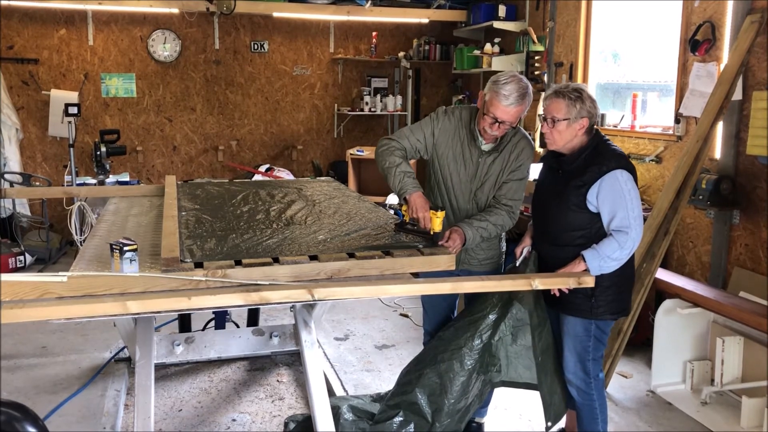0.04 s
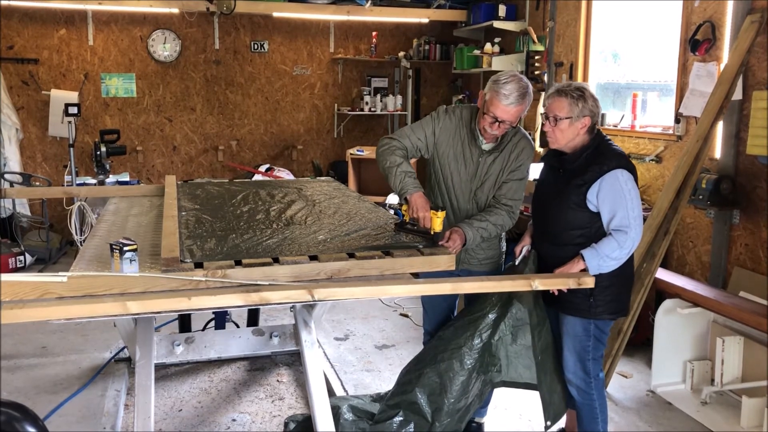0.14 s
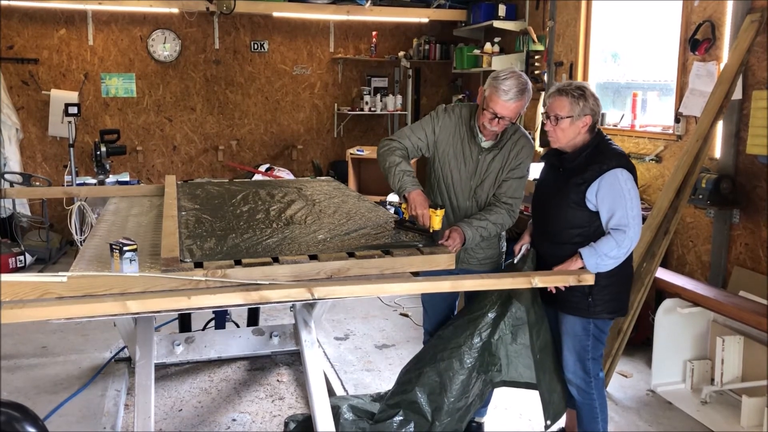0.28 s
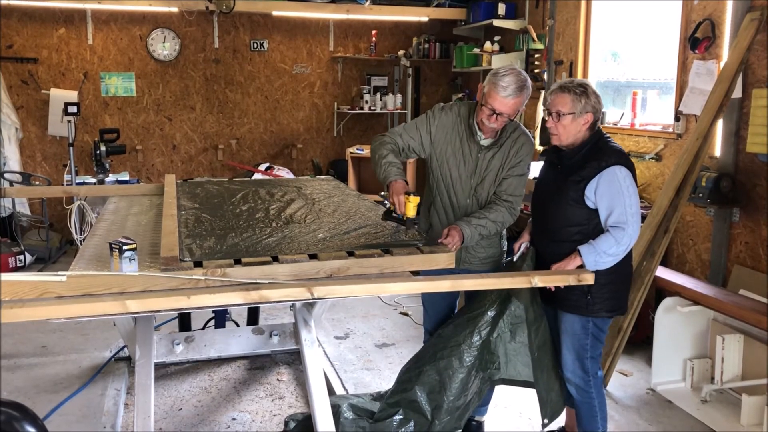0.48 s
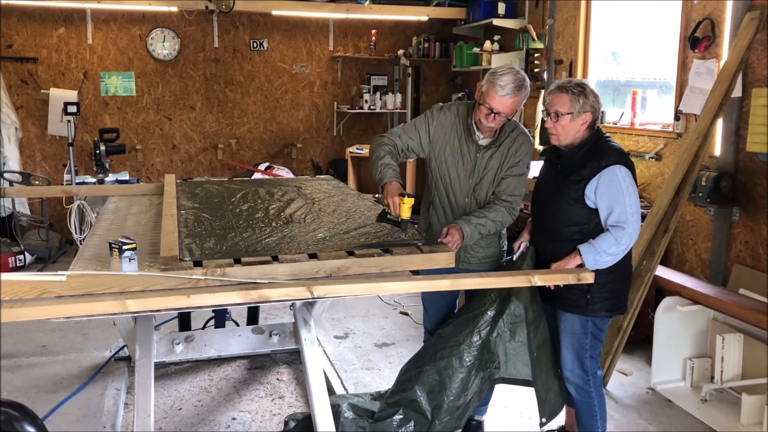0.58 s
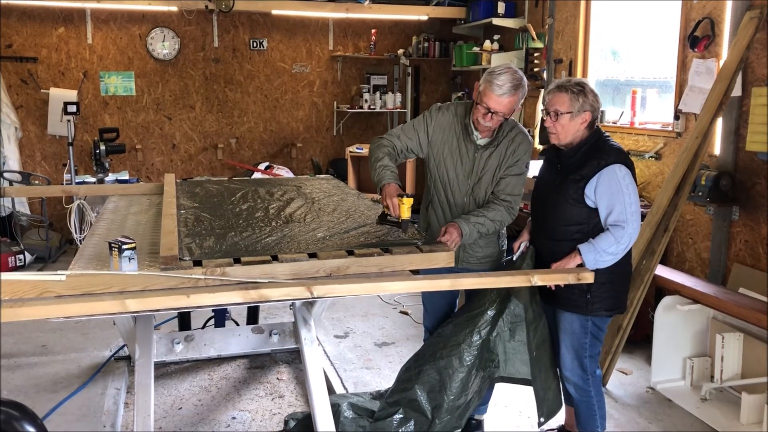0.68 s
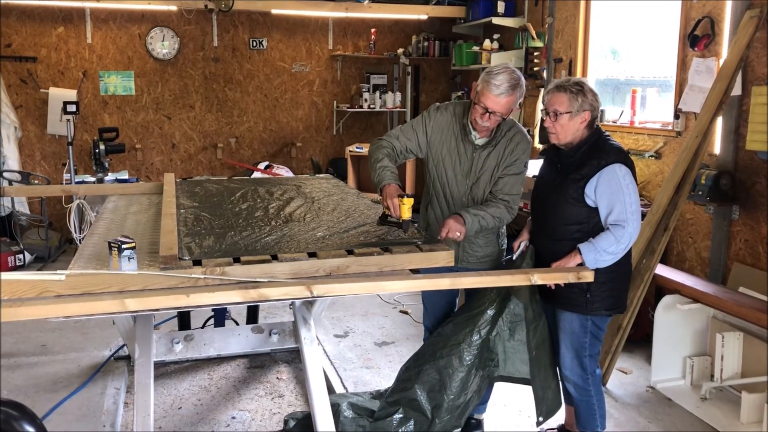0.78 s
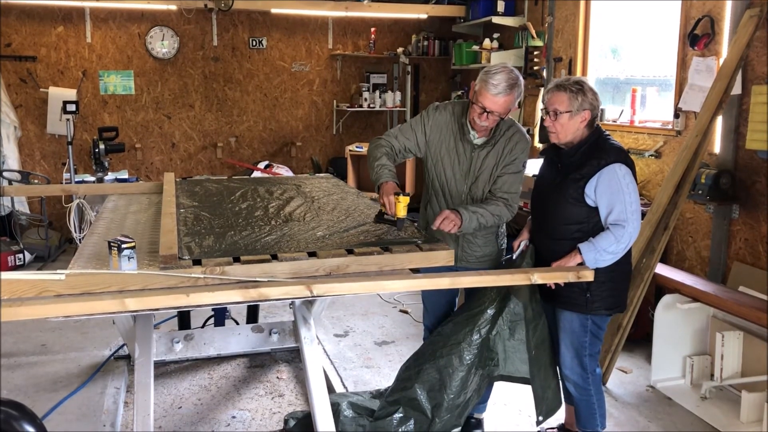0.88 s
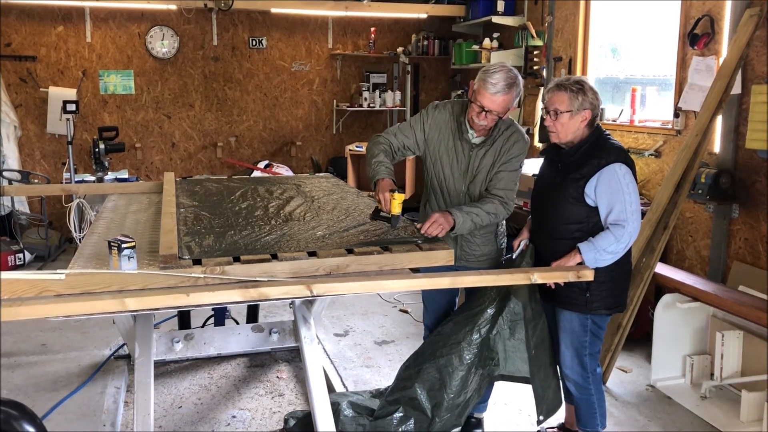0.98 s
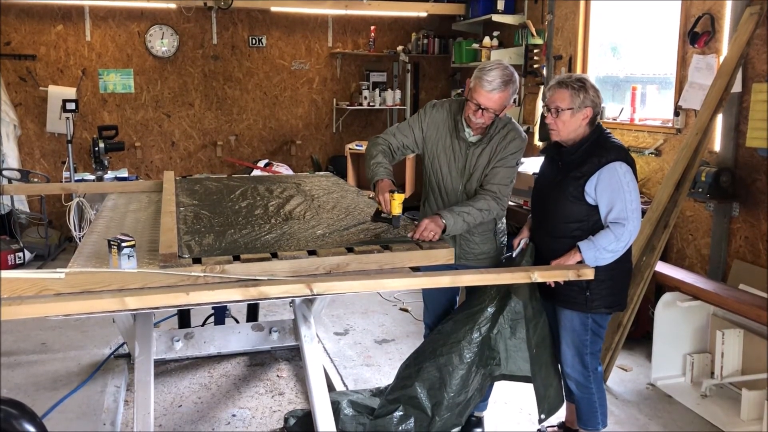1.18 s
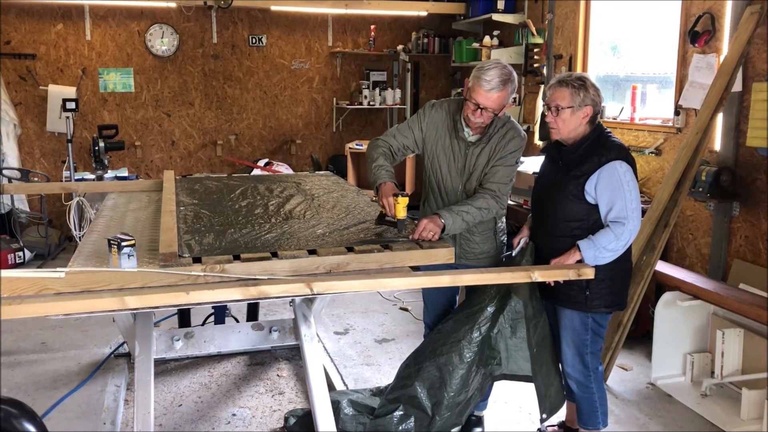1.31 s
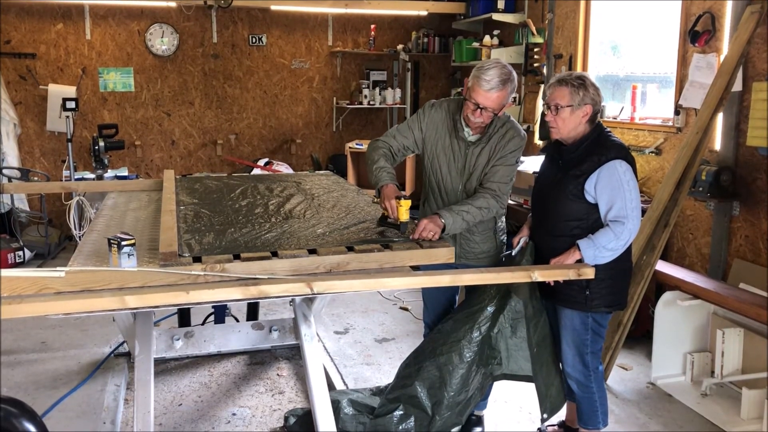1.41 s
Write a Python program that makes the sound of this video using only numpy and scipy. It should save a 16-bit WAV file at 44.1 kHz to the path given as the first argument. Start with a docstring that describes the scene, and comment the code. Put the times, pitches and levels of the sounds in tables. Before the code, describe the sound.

An air-driven staple gun fires once into a wooden frame with a hard, rattling crack and brief ring, then a bright puff of exhaust air and a dull knock; faint tarpaulin rustle follows in a quiet workshop.

```python
"""A low room tone of filtered noise, with a faint hum, lies under a board-lined workshop throughout.
An air-driven staple gun fires once into a wooden frame: the valve hisses, long tones swell, and the
driver slams home and the frame rebounds, from noise bursts and ringing resonators. The exhaust then
vents in puffs of bright noise, the level dips briefly, and the piston knocks back.
Later a tarpaulin rustles, made of random grains and a few crisp snaps."""
import sys
import numpy as np
from scipy import signal
from scipy.io import wavfile

SR = 44100
rng = np.random.default_rng(int(sys.argv[2]) if len(sys.argv) > 2 else 0)


def transcribe(signal):
    """Save signal, clipped to [-1, 1], as a 16-bit WAV file at the path in sys.argv[1]."""
    frames = np.atleast_2d(signal).T
    limited = np.clip(frames, -1, 1)
    pcm = np.round(limited * 32767).astype(np.int16)
    wavfile.write(sys.argv[1], SR, pcm)


def ratio(d):
    """dB to gain"""
    e = np.asarray(d, float) / 20
    return 10 ** e


N = 63945  # length in samples


def noise():
    """Two independent rows of white noise, for the two sets of bands."""
    return rng.standard_normal((2, N))


def rms_one(x):
    """Scale a sound to an average (rms) strength of one."""
    return x / np.sqrt(np.mean(x ** 2) + 1e-20)


def at_hz(points, hz):
    """Read a table at one pitch, along a logarithmic frequency axis."""
    table_hz, values = np.transpose(points)
    return np.interp(np.log(hz), np.log(table_hz), values)


def level(rows):
    """Gain over time from rows of seconds and dB, silent outside them."""
    s, db = np.transpose(rows)
    return ratio(np.interp(np.arange(N) / SR, s, db, left=-200, right=-200))


def clicks(rows):
    """One single-sample click for each row of seconds and dB."""
    out = np.zeros(N)
    for s, db in rows:
        out[int(s * SR)] = ratio(db)
    return out


def lingering(power, t60):
    """Amplitude of a store of power that drains 60 dB in t60 seconds."""
    keep = ratio(-120 / (t60 * SR))  # power kept from one sample to the next
    return np.sqrt(signal.lfilter([1], [1, -keep], power + 1e-30))


# How long sound lingers in the workshop.
# Each row: frequency in Hz, time to fade by 60 dB in seconds.
ROOM_FADE = [(60, .5), (130, .6), (260, 0.58), (500, .55), (1500, 0.36), (4000, .42), (8000, .36),
             (12000, 0.25), (16000, .27)]
EDGES_HZ = 25 * 2 ** np.arange(0, 9.6, 1 / 3)  # edges of third-octave bands


def bands(sources, colour, fed=None):
    """Third-octave bands dealt in turn from two sources; power fed in lingers at the room's rate."""
    out = 0
    for k, (low, high) in enumerate(zip(EDGES_HZ, EDGES_HZ[1:])):
        middle_hz = np.sqrt(low * high)
        x = sources[k % 2]
        if fed is not None:
            x = x * lingering(fed, at_hz(ROOM_FADE, middle_hz))
        band = signal.butter(2, [low, high], "band", fs=SR, output="sos")
        out = out + ratio(at_hz(colour, middle_hz)) * signal.sosfilt(band, x + 1e-18)
    return out


def crackle(rows, t60):
    """Bright bursts of noise, each dying by 60 dB in t60 seconds."""
    bright = signal.butter(1, [2500, 11300], "band", fs=SR, output="sos")  # Hz
    bursts = rng.standard_normal(N) * lingering(clicks(rows) ** 2, t60)
    return signal.sosfilt(bright, bursts) / 2


# Colour of the room's murmur.
# Each row: frequency in Hz, relative level in dB per Hz.
MURMUR_COLOUR = [(15, -41), (25, -11.5), (117, -1.5), (229, -3), (263, 0.5), (344, -7), (560, -10.5),
                 (911, -13.5), (1160, -14), (1260, -15), (16000, -31.5)]
MURMUR_DB, HUM_DB = -64.5, -72.5
HUM_HZ, HUM_WIDTH_HZ = 263, 12


def room_tone():
    """Low broad murmur of the workshop, with a faint wavering hum from noise through a narrow peak."""
    murmur = rms_one(bands(noise(), MURMUR_COLOUR))
    peak = signal.iirpeak(HUM_HZ, HUM_HZ / HUM_WIDTH_HZ, fs=SR)
    once = signal.lfilter(*peak, rng.standard_normal(N))
    hum = rms_one(signal.lfilter(*peak, once))
    both = ratio(MURMUR_DB) * murmur + ratio(HUM_DB) * hum
    return both[::-1]  # backwards, so the filters' slow start falls at the end


def jet(rows, colour, echo_db):
    """Escaping air: noise of one colour follows the level rows and leaves an echo in the workshop."""
    hiss = bands(noise(), colour)
    echo = ratio(echo_db) * bands(noise(), colour, fed=level(rows) ** 2)
    return (level(rows) * hiss + echo) / np.std(hiss)


# Air escaping at the valve. Each row: time in seconds, level in dB.
VALVE_LEVEL = [(.206, -55), (.211, -29), (.216, -19), (.221, -25), (.227, -25), (.232, -24), (.239, -38),
               (.25, -60)]
# Its colour. Each row: frequency in Hz, relative level in dB per Hz.
VALVE_HISS_COLOUR = [(180, -57.5), (300, -18.5), (2520, -22), (3640, -12.5), (4750, -19.5), (6000, -10.5),
                     (15200, -10), (16000, -3)]


def valve():
    """Bright jet hiss as air rushes through the valve."""
    return jet(VALVE_LEVEL, VALVE_HISS_COLOUR, echo_db=-41.5)


# Long rings set off by the shot: two table tones, then one steel tone.
# Each row: frequency in Hz, level in dB before swell and fade, time to fade by 60 dB in seconds.
LONG_RINGS = [(118, -40.5, 1.5), (259.8, -37, 1.5), (1455, -12, .38)]
SHOT_S, SWELL_S = 0.22, 0.05
RING_WANDER = 0.15  # size of the random phase drift


def rings():
    """Two table tones and one steel tone swell, waver a little and die slowly."""
    t = np.maximum(np.arange(N) / SR - SHOT_S, 0)
    swell = (1 - np.exp(-t / SWELL_S)) ** 2
    out = 0
    for hz, db, t60 in LONG_RINGS:
        wander = np.cumsum(rng.standard_normal(N)) * RING_WANDER * np.sqrt(hz / SR)
        tone = np.sin(2 * np.pi * hz * t + wander)
        out = out + ratio(db - 60 * t / t60) * swell * tone
    return out


# Ways the frame and table can ring: wood rings short, the low table modes linger.
# Each row: frequency in Hz, relative level in dB, time to fade by 60 dB in seconds.
FRAME_MODES = [(118, -28, .6), (145.96, -34, .4), (226, -15, 0.27), (262.9, -20.5, 0.59), (530.4, -10, .15),
               (750, -26.5, 0.19), (942.5, -8.5, 0.27), (1055, -6.5, .15), (1331, -3.5, 0.2),
               (1410, -5.5, 0.23), (1454.6, -5, .25), (1550, -12, 0.072), (1892, -4.5, 0.24),
               (2335, -5.5, 0.24), (2884, -4, 0.028)]
FRAME_DB = -8.5  # gain on all the modes together


def frame(hits, rattle):
    """Each hit sets every mode ringing with a strength of its own; the rattle keeps feeding them."""
    out = 0
    for hz, db, t60 in FRAME_MODES:
        r = ratio(-60 / (t60 * SR))  # amplitude kept from one sample to the next
        w = 2 * np.pi * hz / SR
        strength = rng.uniform(0.41, 1, N) * rng.choice([-1, 1], N)
        drive = hits * strength + rattle
        top, bottom = [0, ratio(db) * np.sin(w)], [1, -2 * r * np.cos(w), r * r]
        out = out + signal.lfilter(top, bottom, drive + 1e-18)
    return ratio(FRAME_DB) * out


BURST_DB, BURST_T60_S = 6, 0.027
BUILD_S = 0.001  # time for the room's answer to build up
RATTLE_DB, RATTLE_T60_S = -37.5, 0.43  # how much, and how long, rattle keeps the modes going
BLOW_TAIL_DB = -4.5  # gain on burst and ring-out together
GAP_HZ, GAP_WIDTH_HZ = 1157, 170  # a gap in burst and ring-out


def struck(rows, colour):
    """Each hit bursts, rings and rattles the frame, and fills the room with a dying noise."""
    power = clicks(rows) ** 2
    burst = ratio(BURST_DB) * bands(noise() * lingering(power, BURST_T60_S), colour)
    r = np.exp(-1 / (BUILD_S * SR))
    tail = bands(noise(), colour, fed=signal.lfilter([1 - r], [1, -r], power))
    gap = signal.iirnotch(GAP_HZ, GAP_HZ / GAP_WIDTH_HZ, fs=SR)
    scale = ratio(BLOW_TAIL_DB) / np.std(bands(noise(), colour))
    rattle = ratio(RATTLE_DB) * rng.standard_normal(N) * lingering(power, RATTLE_T60_S)
    return frame(clicks(rows), rattle) + scale * signal.lfilter(*gap, burst + tail)


def cut_thump(x):
    """Weaken everything below 80 Hz."""
    return signal.sosfilt(signal.butter(2, 80, "high", fs=SR, output="sos"), x)


# The driver hits, then the frame rebounds. Each row: time in seconds, relative level in dB.
DRIVER_BLOWS = [(.2272, -10), (.2355, -6.5), (.2585, -8), (.283, -9), (.2965, -9), (.3140, -8),
                (.335, -19.5)]
# Colour of burst and ring-out. Each row: frequency in Hz, relative level in dB per Hz.
DRIVER_COLOUR = [(30, -44), (90, -39.5), (150, -26), (217, -10), (340, -11.5), (530, -7), (700, -8.5),
                 (1040, 0.5), (1440, 4.5), (2100, -1.5), (2900, -2.5), (3850, -13), (8000, -22.5),
                 (11000, -33.5), (17000, -52.5)]
# Steel crack of the driver. Each row: time in seconds, level in dB before filtering.
STEEL_CRACKS = [(.2272, 0), (.2300, -13.5)]


def blows():
    """The driver's steel cracks, and each blow bursts, rings the frame and fills the room."""
    return cut_thump(crackle(STEEL_CRACKS, t60=0.0092) + struck(DRIVER_BLOWS, DRIVER_COLOUR))


# Air venting in puffs at the exhaust. Each row: time in seconds, level in dB.
EXHAUST_LEVEL = [(.379, -65.5), (.382, -34.5), (.391, -33), (.396, -23), (.403, -24), (.407, -15.5),
                 (.414, -18), (.428, -12), (.44, -31.5), (.455, -26.5), (.48, -38), (.51, -44.5)]
# Its colour. Each row: frequency in Hz, relative level in dB per Hz.
EXHAUST_HISS_COLOUR = [(300, -50.5), (1000, -38), (3500, -11), (6000, -8.5), (10000, 0), (14500, -2.5),
                       (17000, -4)]


def exhaust():
    """Bright puffs of jet hiss as the spent air vents."""
    return jet(EXHAUST_LEVEL, EXHAUST_HISS_COLOUR, echo_db=-32.5)


def brief_dip():
    """Gain that dips by 9 dB for a moment, with short sloping edges."""
    t = np.arange(N) / SR
    start_s, length_s, edge_s = 0.408, 0.024, 0.003
    inside = np.minimum(t - start_s, start_s + length_s - t)
    return ratio(-9 * np.clip(inside / edge_s, 0, 1))


# The piston returns. Each row: time in seconds, relative level in dB.
PISTON_KNOCKS = [(0.432, -24.5), (.492, -33.5), (.69, -58.5)]
# Colour of burst and ring-out. Each row: frequency in Hz, relative level in dB per Hz.
PISTON_COLOUR = [(30, -30), (70, -15), (130, 3), (260, -2), (500, -7.5), (1400, -6.5), (3000, -13),
                 (17000, -39.5)]
KNOCK_BASS_DB, KNOCK_BASS_HZ = 15, 200


def knocks():
    """Duller hits; the low table modes answer them more than they answer the blows."""
    low = signal.butter(2, KNOCK_BASS_HZ, fs=SR, output="sos")
    bass = signal.sosfilt(low, frame(clicks(PISTON_KNOCKS), 0))
    return cut_thump(struck(PISTON_KNOCKS, PISTON_COLOUR) + ratio(KNOCK_BASS_DB) * bass)


# Loudness of the rustle. Each row: time in seconds, level in dB.
RUSTLE_LEVEL = [(.79, -100), (.82, -67), (.87, -89), (1.175, -99), (1.185, -61.5), (1.24, -65.5),
                (1.27, -77), (1.295, -66), (1.325, -57.5), (1.345, -54), (1.39, -58), (1.45, -67)]
# Colour of its grains. Each row: frequency in Hz, relative level in dB per Hz.
GRAIN_COLOUR = [(120, -3), (200, 0), (360, -31), (394, -8), (538, -5.5), (1320, -9), (4350, -9.5),
                (16000, -50)]
# Snaps of the sheet. Each row: time in seconds, level in dB before filtering.
SHEET_SNAPS = [(1.1823, -51), (1.205, -58), (1.2951, -56), (1.324, -47), (1.3794, -48.5)]
GRAINS_PER_S, GRAIN_SPREAD_DB = 2500, 2.5  # in each of the two sources


def tarpaulin():
    """Dense uneven grains under the rustle curve, and a few crisp snaps."""
    sizes = ratio(GRAIN_SPREAD_DB * rng.exponential(1, (2, N))) * rng.choice([-1, 1], (2, N))
    grains = sizes * (rng.random((2, N)) < GRAINS_PER_S / SR)
    rustle = level(RUSTLE_LEVEL) * rms_one(bands(grains, GRAIN_COLOUR))
    return rustle + crackle(SHEET_SNAPS, t60=0.027)


def scene():
    """Mix to one channel; the brief dip touches the staple gun but not the tarpaulin or room tone."""
    murmur = room_tone()
    gun = valve() + rings() + blows() + exhaust() + knocks()
    return (murmur + gun * brief_dip() + tarpaulin())[None]


def band_limit(x):
    """A steep low-pass at the top of the band."""
    return signal.sosfilt(signal.butter(12, 17020, fs=SR, output="sos"), x)


LIMIT_DB, RELEASE_DB_PER_S, ATTACK_S = -1.0, 313.5, 0.0005
CUTOFF_HZ = 16600


def record(dry):
    """A look-ahead limiter turns down the peaks, then the top of the treble is cut."""
    ramp = RELEASE_DB_PER_S * np.arange(N) / SR
    over = np.maximum(20 * np.log10(np.abs(dry[0]) + 1e-9) - LIMIT_DB, 0)
    held = np.maximum.accumulate(over + ramp) - ramp  # jumps up, recovers steadily
    r = np.exp(-1 / (ATTACK_S * SR))
    ahead = int(2 * ATTACK_S * SR)
    cut_db = np.roll(signal.lfilter([1 - r], [1, -r], held), -ahead)
    low_pass = signal.cheby2(10, 45, CUTOFF_HZ, fs=SR, output="sos")
    mix = signal.sosfilt(low_pass, dry * ratio(-cut_db))
    return band_limit(np.clip(mix, -1, 1))


dry = scene()
out = record(dry)
transcribe(out)
```